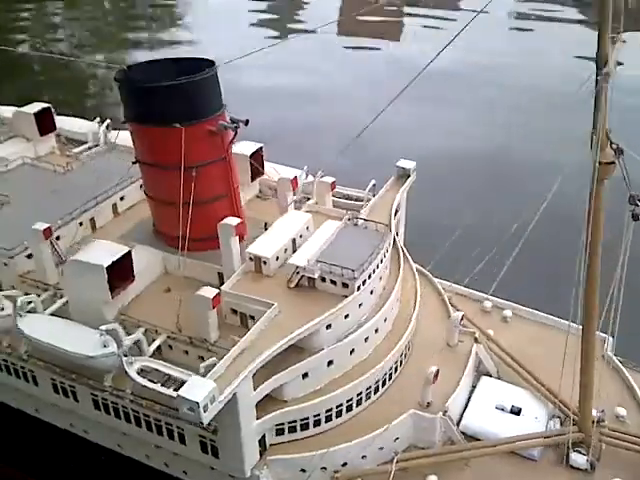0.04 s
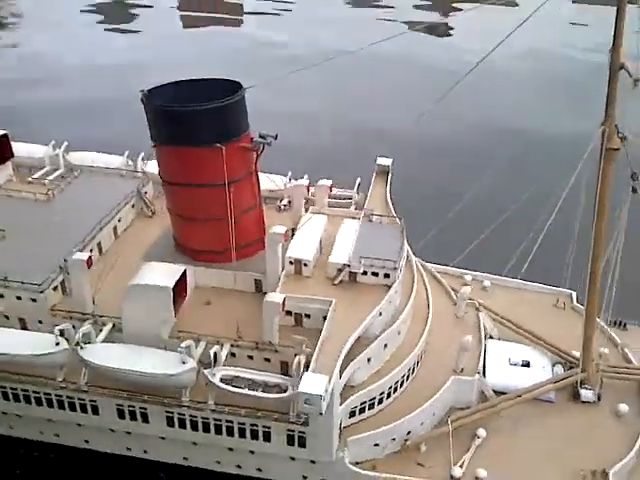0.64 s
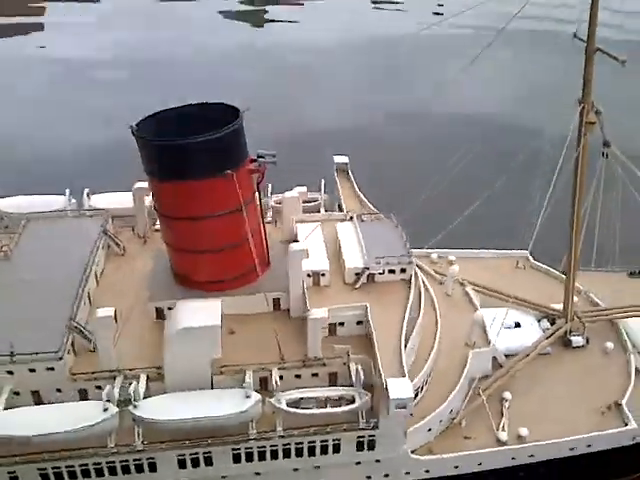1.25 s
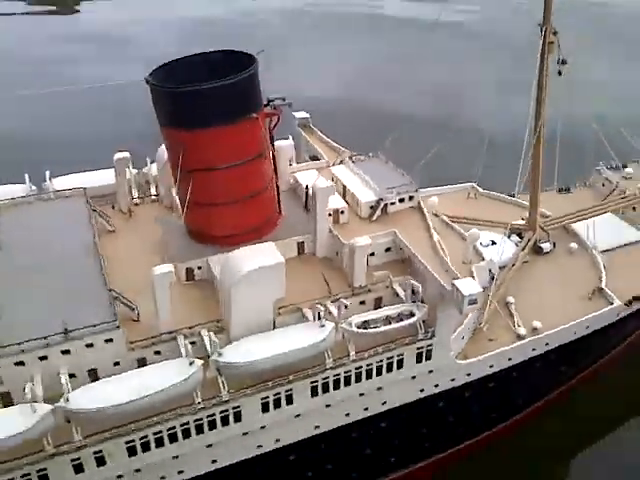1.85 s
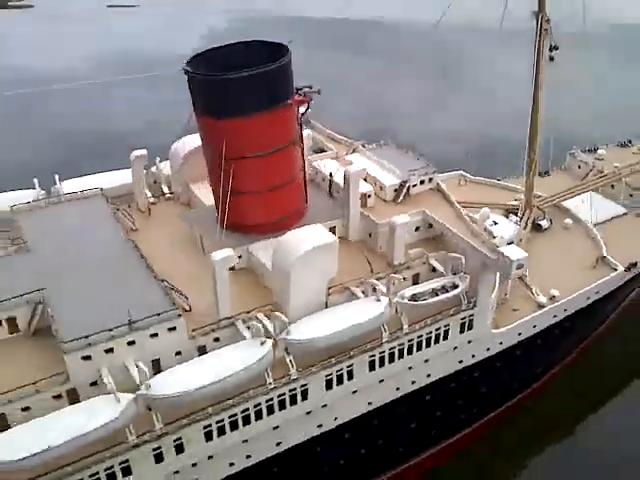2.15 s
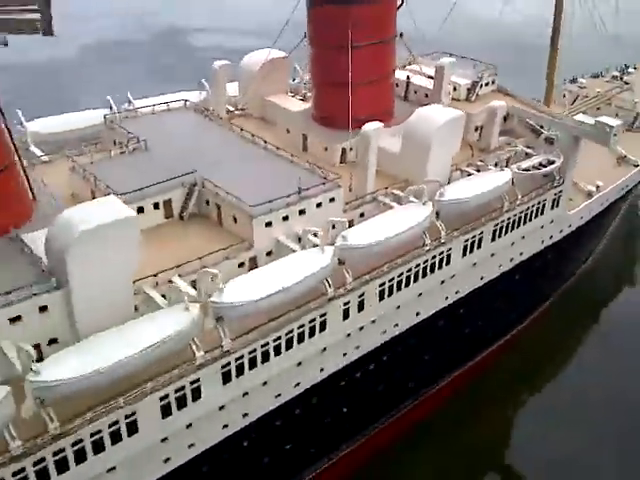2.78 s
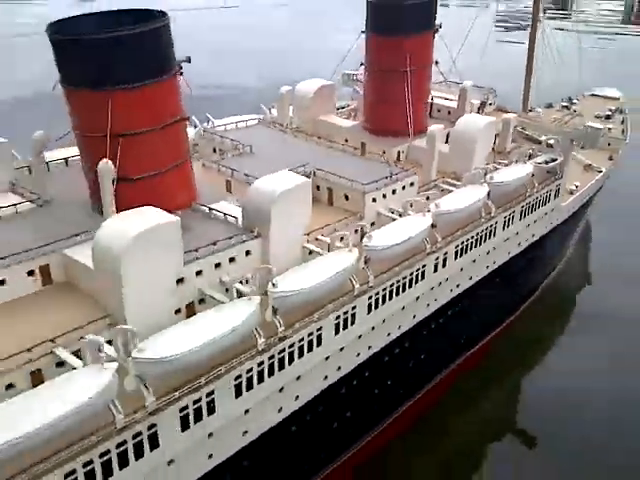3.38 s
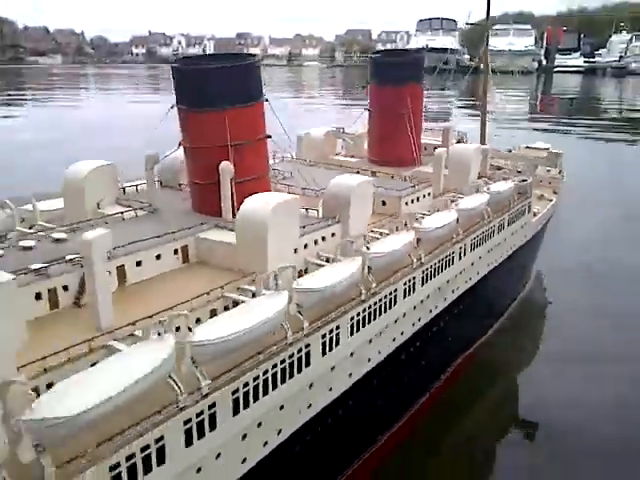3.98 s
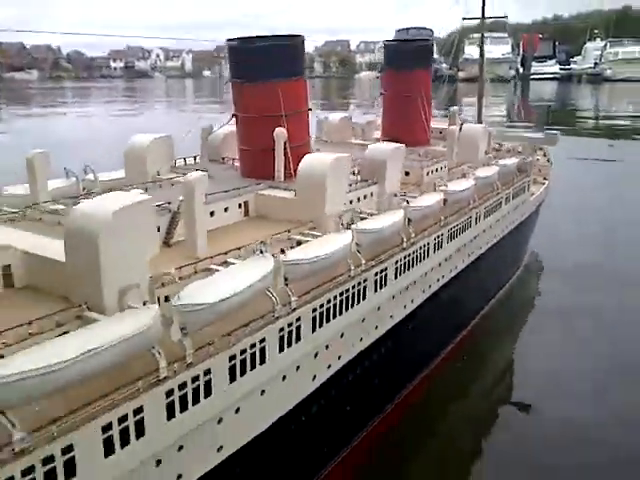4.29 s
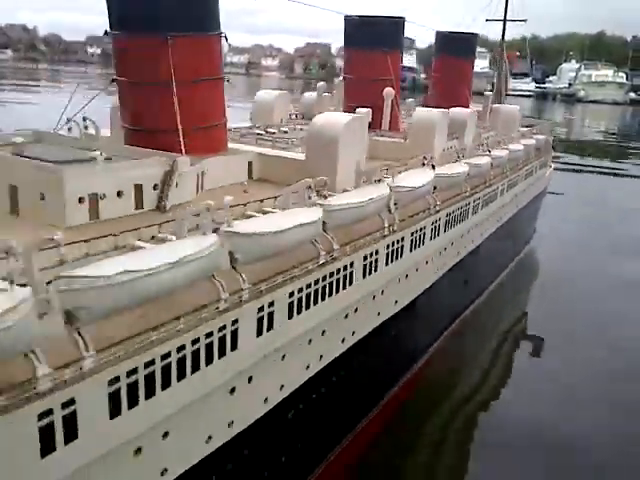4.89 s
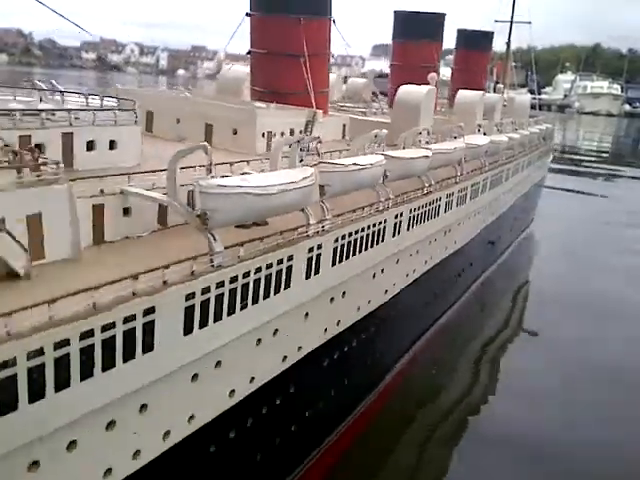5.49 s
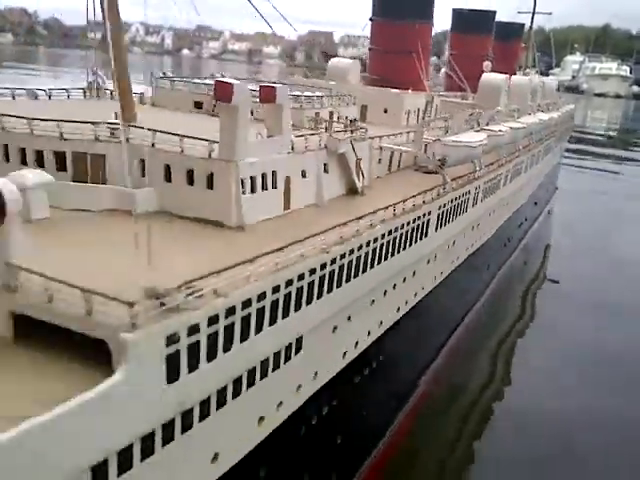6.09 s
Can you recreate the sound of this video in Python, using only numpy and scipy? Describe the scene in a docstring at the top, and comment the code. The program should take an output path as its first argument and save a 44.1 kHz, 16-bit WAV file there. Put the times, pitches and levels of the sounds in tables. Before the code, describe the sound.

A model ocean liner glides past close to the microphone on calm open water. Its small geared electric motor gives a steady, high whine with a fine rapid pulsing. The hollow hull hums and rattles, growing louder as the stern nears. A small bird chirps some way off, mostly in the first half, while a few soft laps and tiny drips sound over a faint outdoor hiss.

```python
"""Model liner gliding by

A model liner passes close on calm water, driven by a small geared electric motor. Its 30-tooth pinion
whines and knocks once a turn; the hollow hull booms and rattles, more as the stern nears. A bird chirps
some way off, ripples lap and a few drips tick over the faint hiss of the open air."""
import sys
import numpy as np
from scipy import signal
from scipy.fft import rfft, irfft, next_fast_len
from scipy.io import wavfile
from scipy.ndimage import uniform_filter1d

SR = 44100
rng = np.random.default_rng(int(sys.argv[2]) if len(sys.argv) > 2 else 0)


def pcm_store(signal):
    """Save signal as 16-bit PCM."""
    levels = np.round(np.clip(np.atleast_2d(signal), -1, 1) * 32767)
    wavfile.write(sys.argv[1], SR, levels.astype(np.int16).T)


N = 275183
TIME, FREQ = np.arange(N) / SR, np.fft.rfftfreq(N, 1 / SR)
SHAFT_HZ, PROP_HZ, TEETH = 45.469, 17.16, 30

# fader rides of the tooth tone and the gear mount's lower ring: (time [s], relative level [dB])
WHINE_RIDE = [(0.05, -51), (0.46, -52), (0.68, -54), (1.39, -53.5), (1.88, -57), (2.17, -52), (2.5, -55),
              (2.64, -60), (2.74, -62), (2.98, -54.5), (3.17, -53), (3.42, -59.5), (4.2, -46), (5.57, -52),
              (5.79, -58), (5.96, -67.5), (6.05, -57.5), (6.2, -54)]
LOW_RING_RIDE = [(0.1, -77), (0.59, -70), (1.24, -68), (1.57, -80), (1.9, -65), (2.78, -58), (4.36, -70.5),
                 (4.43, -64), (5.37, -56.5), (6.03, -70.5), (6.24, -52.5)]
# partials of the upper, middle and lower ring: (shaft order, relative level [dB])
RING_PARTIALS = [{29: 0, 31: -23, 32: -33.5}, {27: -7.5, 28: 0}, {24: -17, 25: -6.5, 26: 0}]
# how the upper and middle ring track the whine: (offset [dB], share of its swells, share of the pass-by)
RING_TRACKING = [(-4, .8, 0.077), (-3.5, 0.23, 0.44)]
# the motor's pass-by: (abeam at [s], closest distance [m], loss per doubling of distance [dB])
MOTOR_PASS = (5.43, 0.38, 7.55)


def gears(turns, tooth_db=2.5, ring_db=-2.6, low_db=1.0, chatter_db=-11, scatter=(.04, .11, .11)):
    """Meshing teeth whine; a tight spot rings the gear mount once a turn, choking the tone or knocking."""
    whine_db = curve(WHINE_RIDE) + tooth_db
    mean_db, near = whine_db.mean(), passing(*MOTOR_PASS)
    gains = [amp(mean_db + db + follow * (whine_db - mean_db)) * near ** share
             for db, follow, share in RING_TRACKING]
    gains.append(amp(curve(LOW_RING_RIDE) + low_db))
    whine = amp(whine_db) * evened(np.cos(2 * np.pi * TEETH * turns)) * (1 + 0.015 * drift(16))
    ring = sum(gain * knocks(turns, partials, spread * near ** 2)
               for gain, partials, spread in zip(gains, RING_PARTIALS, scatter))
    chatter = sum(gain * noise(resonances([(hz, 80, 0)])) for gain, hz in zip(gains, (1340, 1280, 1170)))
    roughness = 1 + 0.1 * drift(25)
    return whine + amp(ring_db) * ring * roughness + amp(chatter_db) * chatter


# the ring's lead over the whine; near half a cycle it chokes, near zero it knocks: (time [s], lead [cycles])
RING_LEAD = [(0, -0.38), (2.3, -0.5), (3.15, -0.33), (3.45, -0.03), (3.58, -0.03), (4.0, -0.5)]


def knocks(turns, partials, scatter):
    """Partials in step, one pulse a turn; echoes inside the hull slowly scatter their phases."""
    lead = curve(RING_LEAD)
    return evened(sum(amp(db) * np.cos(2 * np.pi * (order * turns + lead + scatter * drift(0.63)))
                      for order, db in partials.items()))


def shaft(wander_hz=0.01363, start_turns=.22, runout_teeth=.013):
    """Running count of motor turns; the big gear's uneven teeth rock the pinion each propeller turn."""
    uneven = sum(np.sin(2 * np.pi * (k * PROP_HZ * TIME + rng.random())) for k in range(1, 6))
    speed_hz = SHAFT_HZ + wander_hz * drift(1.22)
    return start_turns + np.cumsum(speed_hz) / SR + runout_teeth * uneven / TEETH


# partials around the whine's 2nd to 5th harmonic: (shaft order, relative level [dB])
HARMONIC_CLUSTERS = [{59: 0, 60: -1, 61: -9, 62: -13}, {87: -17, 89: 0, 90: -9, 91: -14, 92: -20}, {115:
                     -20, 117: -19, 119: 0, 120: -22, 121: -19}, {147: -6, 148: 0, 149: 0, 151: -6, 153:
                     -13}]
# the 2nd and 5th beam out in lobes that sweep past:
# (level when closest [dB], share of the pass-by, crest time [s], crest spacing [s], swing [dB])
HARMONIC_LOBES = [(-70.5, 0.9, 4.93, 1.2, 2.5), (-73, 0.97, 5.65, 1.7, 3)]
# the 3rd and 4th whistle and fade as the motor goes by: (time [s], relative level [dB])
THIRD_RIDE = [(0, -80), (1.2, -76.5), (1.7, -81), (2.6, -91), (2.75, -72.5), (2.91, -78.5), (2.94, -92),
              (3.15, -70.5), (3.69, -76), (3.84, -89), (4.2, -66.5), (4.36, -86), (4.44, -70.5),
              (4.69, -74), (4.95, -68), (5.03, -79.5), (5.32, -64.5), (5.84, -73), (6.05, -63.5),
              (6.24, -70)]
FOURTH_RIDE = [(0, -81.5), (2.2, -79), (3.0, -75.5), (3.07, -72.5), (3.83, -67.5), (3.9, -79), (4.03, -64),
               (4.39, -73), (5.12, -62), (5.29, -72.5), (5.37, -67), (5.57, -72), (5.82, -55),
               (6.09, -67.5), (6.24, -61)]
# the shaft's pass-by: (abeam at [s], closest distance [m], loss per doubling [dB])
SHAFT_PASS = (5.66, 0.43, 5.7)


def overtones(turns, third_db=4, fourth_db=3.0, fuzz_db=-8.5, fuzz_width_hz=240, wander_db=1):
    """Thin clusters above the whine: the top partial swells and fades, its neighbours and fuzz less so."""
    out, near = np.zeros(N), passing(*SHAFT_PASS)
    second, fifth = [near ** share * amp(db + swing_db * np.cos(2 * np.pi * (TIME - crest_s) / spacing_s))
                     for db, share, crest_s, spacing_s, swing_db in HARMONIC_LOBES]
    third, fourth = amp(curve(THIRD_RIDE) + third_db), amp(curve(FOURTH_RIDE) + fourth_db)
    for gain, partials in zip([second, third, fourth, fifth], HARMONIC_CLUSTERS):
        main = max(partials, key=partials.get)
        smoothed = np.exp(uniform_filter1d(np.log(gain), SR))
        milder = np.sqrt(gain * smoothed)  # half the swing in dB
        whistle = evened(np.cos(2 * np.pi * main * turns)) * amp(wander_db * drift(4.8))
        main_share = 1 / np.sqrt(sum(amp(db) ** 2 for db in partials.values()))
        neighbours = shaft_tones(turns, {order: db for order, db in partials.items() if order != main})
        out += gain * main_share * whistle + milder * np.sqrt(1 - main_share ** 2) * neighbours
        out += amp(fuzz_db) * milder * noise(resonances([(main * SHAFT_HZ, fuzz_width_hz, 0)]))
    return out


# resonances of the hull's parts: (centre [Hz], width [Hz], relative level [dB])
BOOM_MODES = [(248.8, 25, 0), (284, 88, -1.5)]
BOW_MODES = [(344.4, 27, 0)]
DECK_MODES = [(407, 44, -0.5), (434, 16, 5.5), (479, 120, -2.5), (555, 100, -3.5)]
CHURN_MODES = [(620, 340, -3.5), (730, 300, -6), (1154, 460, -3)]
STERN_MODES = [(783, 150, 0)]
RATTLE_MODES = [(1348, 400, 2.5), (1540, 100, 3.5), (1790, 160, -16.5)]
# their pass-bys: (abeam at [s], closest distance [m], loss per doubling [dB])
BOOM_PASS = (5.25, 0.65, 4.6)
BOW_PASS = (1.9, .4, 3.5)
DECK_PASS = (5.24, 0.29, 6.5)
CHURN_PASS = (7.12, .22, 2.79)
STERN_PASS = (6.2, 0.17, 9.2)
# faint motor buzz: (shaft order, relative level [dB])
BUZZ_PARTIALS = {15: -1, 16: -2.4, 17: 0, 18: -5.5, 19: -2.7, 20: -4.5, 37: -13, 38: -5, 39: -11, 40: -11.5,
                 41: -18, 48: -16.5, 49: -15}


def hull(turns, throb_depth=0.1, lumpy_db=2.15, low_cut_hz=204):
    """The drive shakes the hollow hull, a little harder once a turn; the propeller churns at the stern."""
    def part(modes, pass_by, db):
        return amp(db) * passing(*pass_by) * noise(resonances(modes))

    boom = part(BOOM_MODES, BOOM_PASS, db=-58)
    bow = part(BOW_MODES, BOW_PASS, db=-63.5)
    deck = part(DECK_MODES, DECK_PASS, db=-54)
    churn = part(CHURN_MODES, CHURN_PASS, db=-57)
    stern = part(STERN_MODES, STERN_PASS, db=-55)
    rattle = part(RATTLE_MODES, MOTOR_PASS, db=-59)
    throb = (1 + throb_depth * np.cos(2 * np.pi * turns)) * amp(lumpy_db * drift(45))
    buzz = amp(-62.5) * passing(*CHURN_PASS) * shaft_tones(turns, BUZZ_PARTIALS)
    shaken = boom + bow + deck + (churn + stern + rattle) * throb + buzz
    low_cut = signal.butter(5, low_cut_hz, "high", fs=SR, output="sos")  # a small hull radiates no bass
    return signal.sosfilt(low_cut, shaken)


# the keel's pass-by: (abeam at [s], closest distance [m], loss per doubling [dB])
KEEL_PASS = (3, 0.29, 8.2)


def propeller_thrum(level_db=-60.0, waver_rad=0.3, flutter=0.092):
    """The hull's lowest mode picks out the propeller shaft's 15th harmonic as an unsteady hum."""
    phase = 2 * np.pi * 15 * PROP_HZ * TIME + waver_rad * drift(2.8)
    hum = np.cos(phase) * (1 + flutter * drift(9.1))
    return amp(level_db) * passing(*KEEL_PASS) * evened(hum)


# bird calls, pitched before sag and quaver:
# (time [s], from [Hz], to [Hz], length [s], relative level [dB], fade [dB])
BIRD_CHIRPS = [(0.074, 7130, 5320, 0.058, -54.5, 1.5), (0.441, 6970, 5140, 0.06, -58.5, -10),
               (0.783, 6600, 3580, 0.08, -62.5, 5), (1.069, 6800, 4980, 0.06, -58, 7),
               (1.181, 5200, 4750, 0.023, -61, 6), (1.415, 7050, 5880, 0.026, -56.5, 2),
               (1.723, 6740, 3950, 0.11, -62, 14), (1.868, 4100, 3960, 0.042, -70, 2),
               (2.08, 7000, 5120, 0.046, -56.5, 12), (2.181, 4770, 4950, .015, -59, 0),
               (2.465, 6700, 3480, 0.05, -68, 5), (2.78, 6950, 4880, 0.041, -56, 11),
               (2.892, 5400, 4700, 0.025, -70, -1), (3.824, 4950, 4700, 0.024, -59.5, -2),
               (5.968, 7000, 6260, .03, -69, 14)]


def bird(trim_db=-1, flutter=0.54, fall_s=.012, sag_hz_per_s=1500):
    """Each chirp drops quickly in pitch and then sags on a quavering note."""
    out = np.zeros(N)
    quaver = 1 + .009 * drift(150)
    for s, from_hz, to_hz, length, db, fade_db in BIRD_CHIRPS:
        t = np.arange(int(length * SR)) / SR
        drop_hz = to_hz + (from_hz - to_hz) * np.exp(-(t / fall_s) ** 2)
        hz = (drop_hz - sag_hz_per_s * (t - length / 2)) * np.interp(s + t, TIME, quaver)
        envelope = amp(db - fade_db * t / length) * signal.windows.tukey(len(t), .25)
        add(out, s, envelope * np.sin(2 * np.pi * np.cumsum(hz) / SR))
    return amp(trim_db) * out * (1 + flutter * drift(120))


# water lapping at the hull: (time [s], pitch [Hz], relative level [dB], decay [s])
LAP_CUES = [(0.499, 350, -58.5, 0.066), (.545, 582, -53.5, 0.017), (.885, 646, -64, 0.043),
            (1.89, 553, -59, 0.018), (3.66, 530, -57, 0.015), (3.664, 915, -52, 0.012),
            (3.71, 2070, -70.5, 0.28)]


def laps(trim_db=-1, spread=0.23, attack_s=0.0063):
    """Ripples slap and swish along the hull: soft noise bursts, each around one pitch."""
    out, t = np.zeros(N), np.arange(SR // 2) / SR
    edge = 1 + spread / 2
    for s, hz, db, decay in LAP_CUES:
        band = signal.butter(2, [hz / edge, hz * edge], "band", fs=SR, output="sos")
        slosh = evened(signal.sosfilt(band, rng.standard_normal(len(t))))
        envelope = 2 * (1 - np.exp(-t / attack_s)) * np.exp(-t / decay)
        add(out, s, amp(db) * envelope * slosh)
    return amp(trim_db) * out


# drips landing: (time [s], relative level [dB], decay [s])
DRIP_CUES = [(0.471, -51.5, .003), (0.502, -54.5, 0.01), (.548, -61.5, 0.03), (1.102, -56.5, 0.0057),
             (1.294, -60, .004), (1.447, -60, .008), (2.075, -64, .002), (2.18, -56, 0.0086),
             (3.829, -56, 0.0054), (5.991, -55, .02)]
# colour of their splash: (frequency [Hz], relative level [dB])
SPLASH_EQ = [(900, -23), (2000, 7.5), (3500, 2.5), (5500, 1.5), (8000, -27)]


def drips(trim_db=-1):
    """Tiny splashes: bright noise with a hard attack and a quick decay."""
    envelope, t = np.zeros(N), np.arange(SR // 8) / SR
    for s, db, decay in DRIP_CUES:
        add(envelope, s, amp(db) * np.exp(-t / decay))
    return amp(trim_db) * envelope * noise(spectrum(SPLASH_EQ))


def shore_echoes(x, wet_db=-7, t60_s=0.39, density=.04):
    """Adds scattered echoes from the banks and moored boats."""
    t = np.arange(SR // 2) / SR
    taps = rng.standard_normal(len(t)) * (rng.random(len(t)) < density) * amp(-60 * t / t60_s)
    return x + amp(wet_db) * signal.fftconvolve(x, taps / np.linalg.norm(taps))[:N]


# colour of the open-air bed: (frequency [Hz], relative level [dB])
AIR_EQ = [(30, -8.5), (110, -5.5), (170, 1.5), (230, 2), (500, 11.5), (1200, 7.5), (1600, 4), (2100, 2),
          (3200, -0.5), (5000, 0), (7000, -0.5), (7700, -5), (8400, -17.5), (8900, -29.5)]


def air_and_wake(air_db=-64.0, fizz_db=-66.0, flicker_db=4):
    """Steady outdoor hiss, and the flickering fizz of the wake that comes with the churn."""
    fizz = noise(spectrum([(700, -29.5), (2000, 0.0), (4500, -5.5), (7000, -6), (8800, -27)]))
    hiss = noise(spectrum(AIR_EQ))
    flicker = amp(flicker_db * np.tanh(drift(60)))
    return amp(air_db) * hiss + amp(fizz_db) * passing(*CHURN_PASS) * fizz * flicker


def passing(abeam_s, closest_m, doubling_db, speed_m_per_s=.3):
    """Gain of a part of the boat that glides by in a straight line; 1 when it is abeam."""
    distance = np.hypot(closest_m, speed_m_per_s * (TIME - abeam_s))
    return amp(-doubling_db * np.log2(distance / closest_m))


def shaft_tones(turns, partials):
    """Multiples of the shaft rate in random phase, rms 1."""
    return evened(sum(amp(db) * np.cos(2 * np.pi * (order * turns + rng.random()))
                      for order, db in partials.items()))


def noise(shape):
    """Noise of rms 1 with the given magnitude over FREQ."""
    size = next_fast_len(N)
    shape = np.interp(np.fft.rfftfreq(size, 1 / SR), FREQ, shape)
    return evened(irfft(rfft(rng.standard_normal(size)) * shape, size)[:N])


def drift(hz):
    """Random modulation up to about hz, rms 1."""
    return noise(np.exp(-(FREQ / hz) ** 2))


def spectrum(points):
    """EQ magnitude through (frequency [Hz], level [dB]) points."""
    hz, db = np.transpose(points)
    return amp(np.interp(np.log(FREQ + 1), np.log(hz), db))


def resonances(modes):
    """Magnitude of a few steep-sided resonances."""
    return np.sqrt(sum((amp(db) / (1 + (2 * (FREQ - hz) / width) ** 2)) ** 2 for hz, width, db in modes))


def curve(points):
    """Automation through (time [s], value) points."""
    return np.interp(TIME, *np.transpose(points))


def amp(db):
    """Decibels to gain."""
    return 10 ** (np.asarray(db) / 20)


def evened(x):
    """Scales to rms 1."""
    return x / np.sqrt(np.mean(x ** 2) + 1e-20)


def add(mix, s, sound):
    """Lays a sound into the mix at s seconds."""
    part = mix[round(s * SR):][:len(sound)]
    part += sound[:len(part)]


def scene():
    """The boat up front, with water, air and the bird around it, in mono."""
    turns = shaft()
    boat = gears(turns) + overtones(turns) + hull(turns) + propeller_thrum()
    return (boat + air_and_wake() + laps() + drips() + shore_echoes(bird()))[None]


def record(dry, high_cut_hz=8920):
    """A steep high cut on the whole mix."""
    high_cut = signal.firwin(511, high_cut_hz, window=("kaiser", 9), fs=SR)
    return signal.oaconvolve(dry, high_cut[None], "same")


dry = scene()
out = record(dry)
pcm_store(out)
```